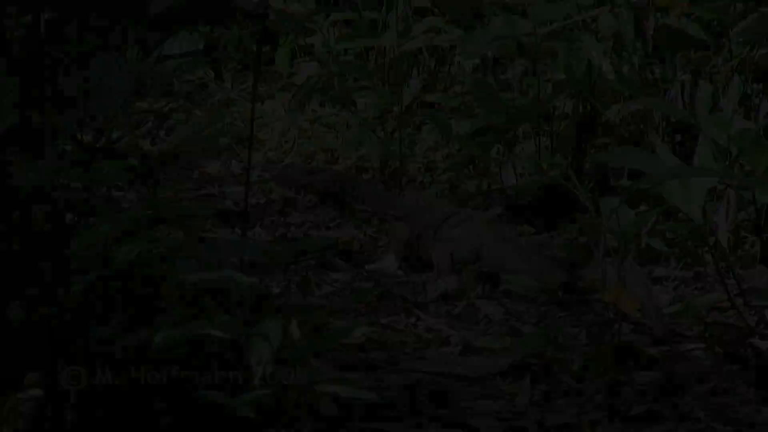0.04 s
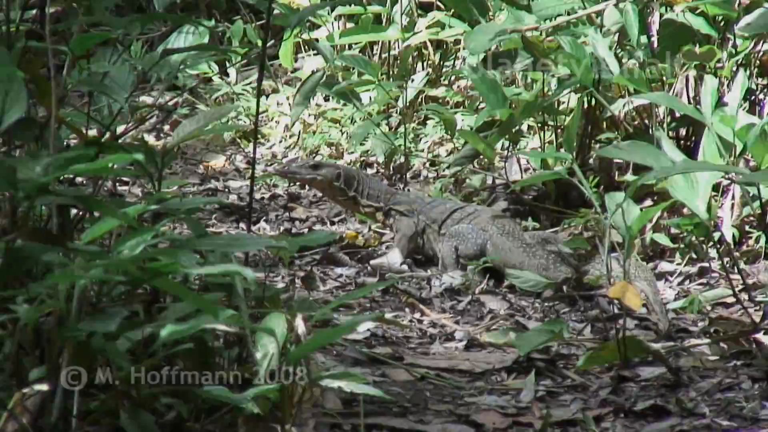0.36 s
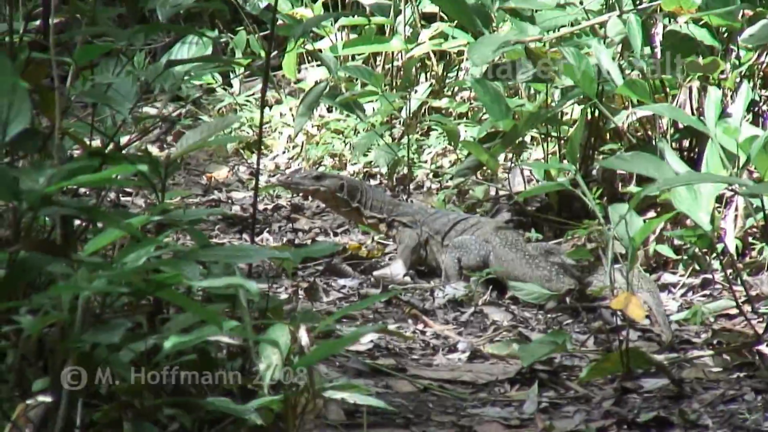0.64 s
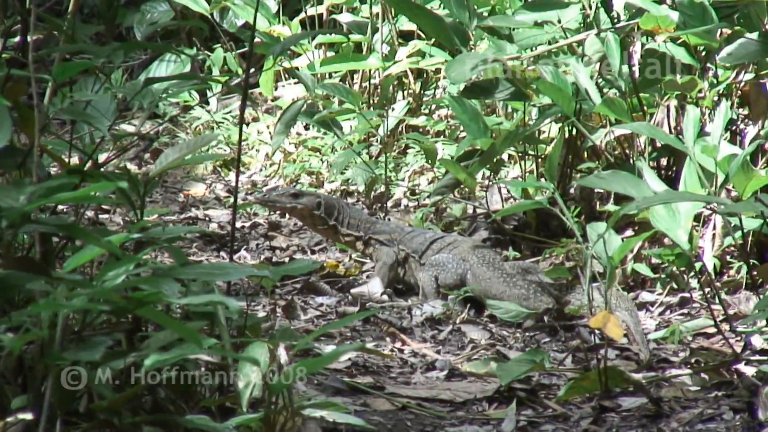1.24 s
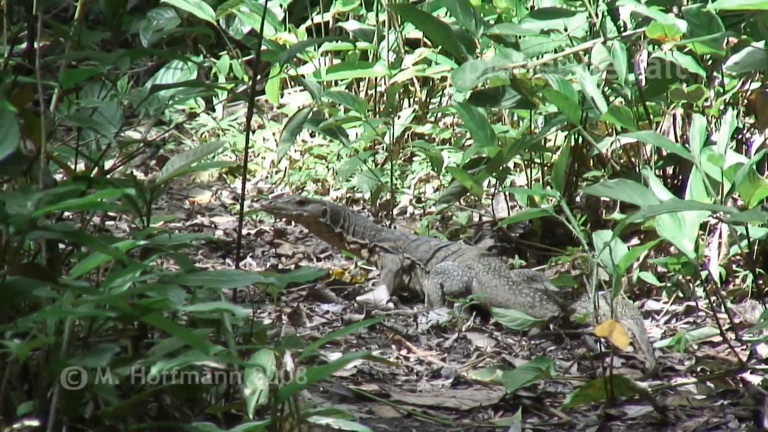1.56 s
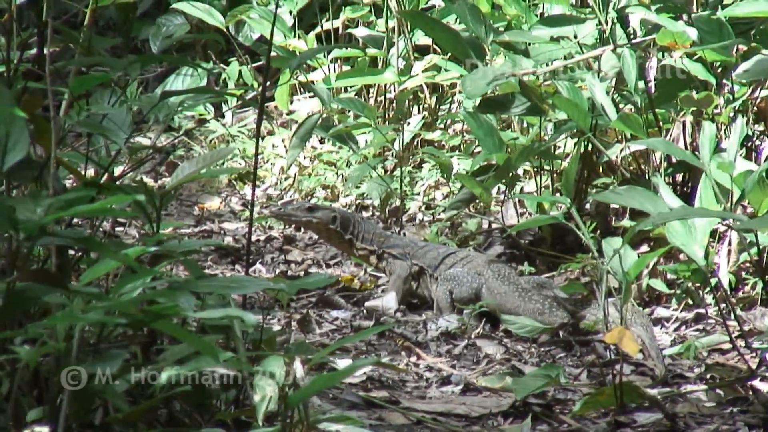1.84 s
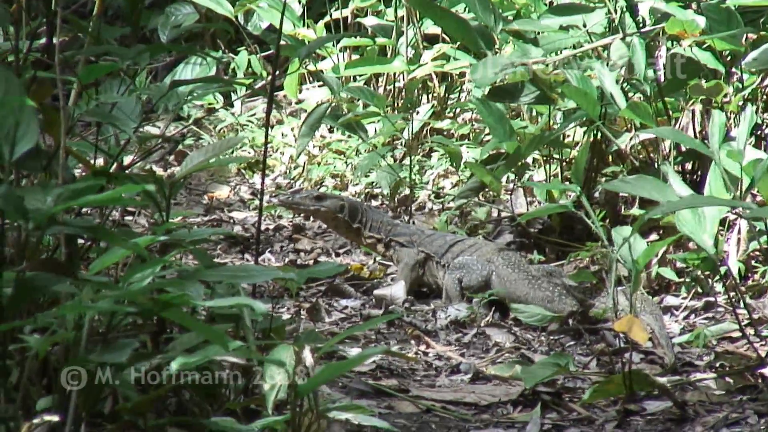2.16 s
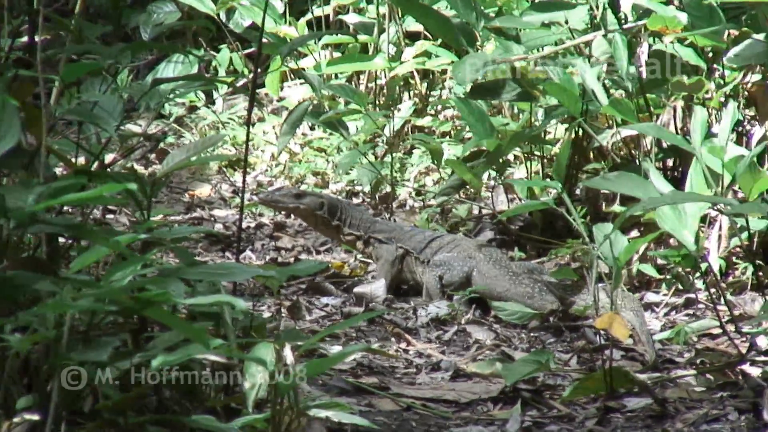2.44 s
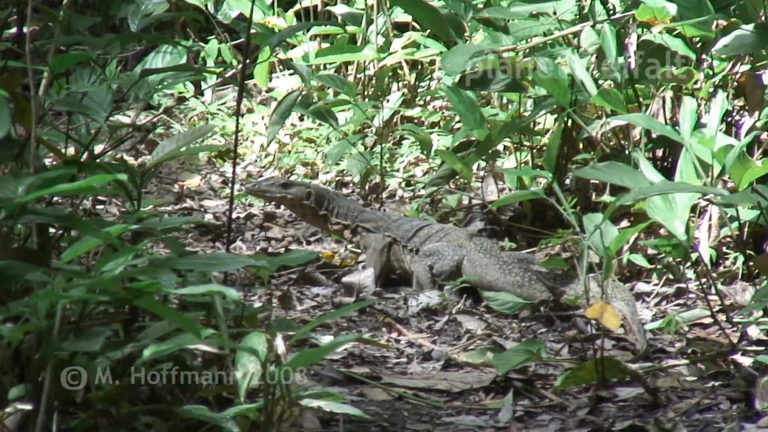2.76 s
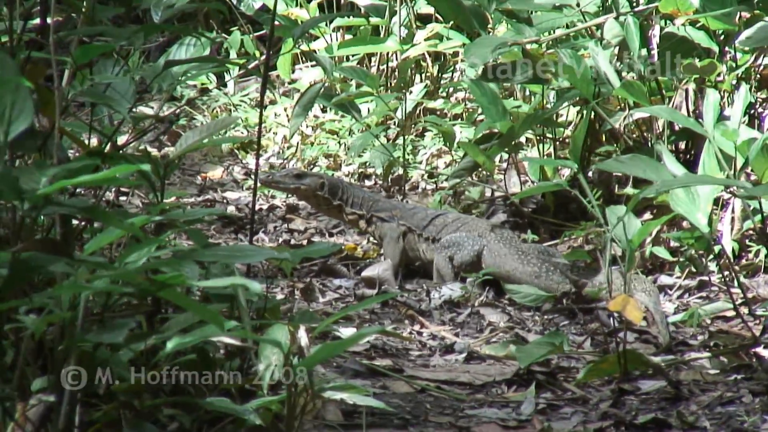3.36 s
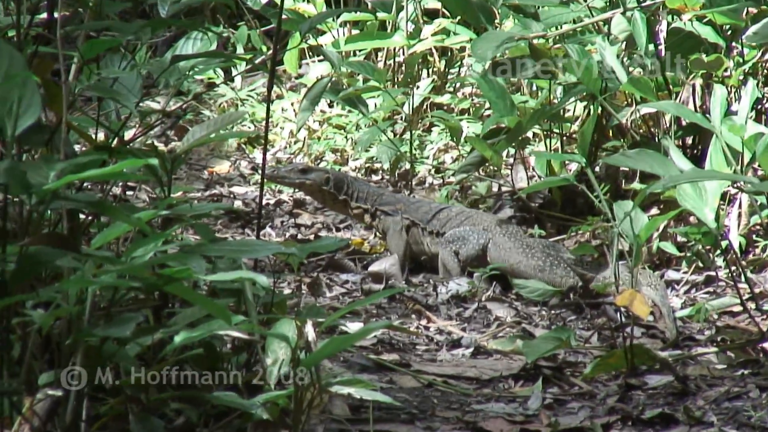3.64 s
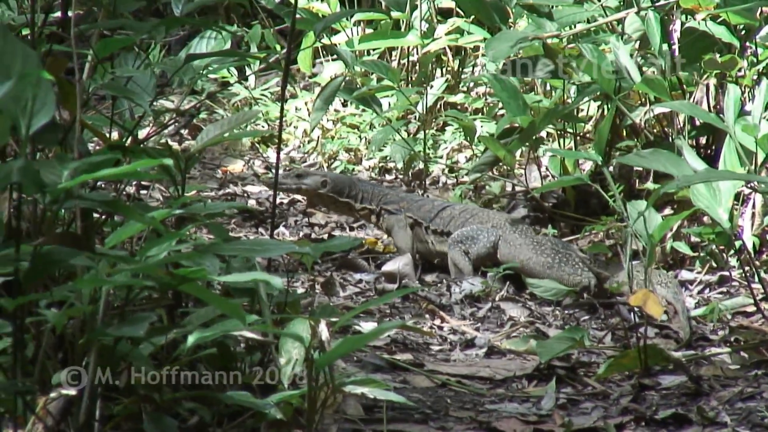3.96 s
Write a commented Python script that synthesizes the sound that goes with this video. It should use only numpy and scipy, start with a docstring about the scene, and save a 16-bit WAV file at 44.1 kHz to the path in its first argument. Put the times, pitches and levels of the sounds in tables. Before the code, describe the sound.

A chorus of cicadas and crickets fades in over the first half second and drones on all around until the end, at about 4 seconds. The cicadas' rattle eases slightly under the crickets' high sizzle. A nearer cricket, a little to the right, scrapes a short, very high buzz about every half second. Underneath lie a faint distant rumble, an even hiss and a barely audible motor hum.

```python
"""Tropical forest insects

Choruses of cicadas and bush crickets click all around, blurred into a drone by the foliage. One nearer
bush cricket scrapes a short buzz twice a second, strongest near 14.5 kHz. Underneath sits a bed of far
rumble, even hiss and faint motor hum. The whole mix fades in."""
import sys
import numpy as np
from scipy import signal
from scipy.fft import rfft, irfft, next_fast_len
from scipy.io import wavfile
from scipy.ndimage import map_coordinates

SR = 44100
rng = np.random.default_rng(int(sys.argv[2]) if len(sys.argv) > 2 else 0)


def store_pcm(level_fs):
    """Save levels as 16-bit WAV."""
    pcm = np.round(np.clip(level_fs, -1, 1) * 32767).astype(np.int16)
    wavfile.write(sys.argv[1], SR, np.atleast_2d(pcm).T)


N = 176400
TIME = np.arange(N) / SR


# Level ride of all the cicadas: t/s, level/dB
CICADA_RIDE = [(.3, -42.5), (.85, -43.5), (1.3, -44), (1.9, -45), (2.4, -46), (2.9, -46.5), (3.5, -47.5),
               (4, -46)]
# Cicada resonances: f/Hz, half width/Hz, flank steepness, level over the ride/dB, pan/dB
CICADA_BANDS = [(3654, 155, 2.76, -5.5, -2), (3967, 308, 2.07, 2, 1.3), (7850, 750, 1.83, -0.2, 0)]
def cicadas():
    """Massed clicks ring as a rattle near 4 kHz and its octave, easing and swelling together."""
    ride_db = np.interp(TIME, *np.transpose(CICADA_RIDE))
    return sum(chorus(hz, width_hz, steepness) * amp(ride_db + db) * pan(pan_db)
               for hz, width_hz, steepness, db, pan_db in CICADA_BANDS)


# Cricket choruses: f/Hz, half width/Hz, flank steepness, mid-scene level/dB, drift/(dB/s), pan/dB
CRICKET_BANDS = [(10514, 1480, 3.75, -37, 0.04, 1.6), (14770, 790, 2.7, -48.5, -1, 2.5),
                 (15360, 730, 2.6, -42.5, -1, 2)]
def far_crickets():
    """Distant bush crickets merge into a high sizzle whose top end slowly eases."""
    return sum(chorus(hz, width_hz, steepness) * amp(db + drift * (TIME - TIME.mean())) * pan(pan_db)
               for hz, width_hz, steepness, db, drift, pan_db in CRICKET_BANDS)


def chorus(pitch_hz, width_hz, steepness, singers=32, clicks_per_s=270, wet_db=-16):
    """Singers on each side click at their own rates, ring one resonance and blur among the leaves."""
    sides = [sum(clicks(clicks_per_s * np.exp(.2 * rng.standard_normal()), jitter=.35, scatter_db=2)
                 for _ in range(singers)) for side in range(2)]
    tone = lambda hz: resonance(hz, pitch_hz, width_hz, steepness) * (hz > pitch_hz / 4)
    direct = filtered(np.array(sides), tone)
    song = unit(unit(direct) + amp(wet_db) * unit(foliage(direct.sum(axis=0))))
    waver_db = .37 * np.array([wobble(11), wobble(11)])  # each side on its own
    surge_db = .54 * wobble(50)  # both sides together
    return song * amp(waver_db + surge_db)


# Buzz peaks: t/s, level before the dry/wet mix/dB
BUZZ_CUES = [(.155, -35), (.662, -35.3), (1.186, -36), (1.688, -36.8), (2.174, -37.5), (2.664, -35),
             (3.156, -35.5), (3.65, -36)]
# Wing resonances: f/Hz, half width/Hz, relative level/dB
WING_MODES = [(14620, 500, -1), (7330, 450, -9.5), (3720, 400, -11)]
def near_cricket(rise_s=.033, fall_s=.032, strokes_per_s=290, lag_s=28e-6, dry_db=-3, wet_db=-2):
    """Each buzz is a run of file strokes that swells and dies away, ringing the bush cricket's wing."""
    swell = sum(amp(db) * np.exp(-np.maximum((peak_s - TIME) / rise_s, (TIME - peak_s) / fall_s))
                for peak_s, db in BUZZ_CUES)
    wing = lambda hz: sum(amp(db) * resonance(hz, centre_hz, width_hz, steepness=2.6)
                          for centre_hz, width_hz, db in WING_MODES)
    strokes = clicks(strokes_per_s, jitter=.03, scatter_db=1.5)
    buzz = swell * unit(filtered(strokes, wing))
    # Placed to the right: the left ear hears it later and softer.
    direct = filtered(buzz, lambda hz: np.exp(np.pi * 1j * hz * lag_s * np.array([[-1], [1]])))
    return amp(dry_db) * direct * pan(-5) + amp(wet_db) * foliage(buzz)


def foliage(x, t60_s=.063):
    """A tight reverb: leaves scatter the sound to each ear along many short paths."""
    t = np.arange(SR // 8) / SR
    tail = rng.standard_normal((2, len(t))) * amp(-60 * t / t60_s)
    return signal.fftconvolve(x[None], tail / np.linalg.norm(tail[0]), axes=1)[:, :N]


# Rumble colour: f/Hz, relative level/dB
RUMBLE_EQ = [(20, -6.5), (45, -3), (100, -1.5), (175, 0.4), (250, -1), (370, 1), (480, -5), (680, -3.5),
             (1000, -11.5), (2000, -22.5), (6000, -62)]
# Rumble stereo image: f/Hz, left-right correlation
RUMBLE_IMAGE = [(35, .2), (80, 0.79), (170, 0.63), (330, 0.22), (700, 0.55)]
def far_rumble(level_db=-46.5):
    """A distant low end that gently heaves."""
    heave_db = .2 * wobble(4.96)
    return amp(level_db + heave_db) * noise_bed(RUMBLE_EQ, RUMBLE_IMAGE) * pan(-2.5)


# Hiss colour: f/Hz, relative level/dB
HISS_EQ = [(20, -2), (500, -6), (1000, 0), (3000, 1), (6000, -0.5), (9000, -2.5), (13000, -29),
           (16000, -23.5)]
# Hiss stereo image: f/Hz, left-right correlation
HISS_IMAGE = [(700, 0.081), (1300, .8), (1800, .85), (2600, 0.53), (3400, 0.33), (4500, 0.1), (8000, -0.17),
              (14000, -.2)]
def hiss(level_db=-43.5):
    """An even wash, narrow in the mids and wide on top."""
    return amp(level_db) * noise_bed(HISS_EQ, HISS_IMAGE) * pan(-1)


# Motor tones: f/Hz, level/dB, pan/dB
MOTOR_TONES = [(354.5, -65, -15.5), (574.7, -65, -12), (601, -68, -4)]
def motor_hum(flutter_db=2.6, wander_hz=1.64):
    """A motor's faint tones, each a little unsteady in level and pitch."""
    hum = 0
    for hz, db, pan_db in MOTOR_TONES:
        gain = amp(db + flutter_db * wobble(6.05))
        phase = 2 * np.pi * np.cumsum(hz + wander_hz * wobble(10)) / SR
        hum += gain * pan(pan_db) * unit(np.sin(phase))
    return hum


def noise_bed(eq, image):
    """Stereo noise of rms 1; the mid/side balance sets the correlation at each frequency."""
    def mid_side_gains(hz):
        angle = np.arccos(np.clip(along(image, hz), -1, 1)) / 2
        return amp(along(eq, hz)) * [np.cos(angle), np.sin(angle)]
    mid, side = filtered(rng.standard_normal((2, N)), mid_side_gains)
    return unit(np.array([mid + side, mid - side]))


def clicks(per_s, jitter, scatter_db):
    """An uneven click train; jitter is a share of the click spacing."""
    timing, strength = rng.standard_normal((2000, 2)).T
    at = np.round((np.arange(len(timing)) + rng.random() + jitter * timing) * SR / per_s).astype(int)
    heard = (at >= 0) & (at < N)
    return np.bincount(at[heard], amp(scatter_db * strength[heard]), N)


def resonance(hz, centre_hz, width_hz, steepness):
    """A ringing peak with adjustable flanks."""
    return (1 + 1j * (hz - centre_hz) / width_hz) ** -steepness


def filtered(x, response):
    """Shape x with a frequency response."""
    size = next_fast_len(N + SR // 2)
    return irfft(rfft(x, size) * response(np.fft.rfftfreq(size, 1 / SR)), size)[..., :N]


def wobble(knots_per_s):
    """A smooth random modulator."""
    return map_coordinates(rng.standard_normal(int(N * knots_per_s / SR) + 4), [TIME * knots_per_s])


def along(points, hz):
    """Read a curve on a log frequency axis."""
    knots_hz, values = np.transpose(points)
    return np.interp(np.log(hz + 1), np.log(knots_hz + 1), values)


def pan(db):
    """Stereo gains for a pan given as left minus right in dB."""
    return amp([[db / 2], [-db / 2]])


def amp(db):
    """Decibels to gain."""
    return 10 ** (np.asarray(db) / 20)


def unit(x):
    """Scale to rms 1."""
    return x / np.sqrt(np.mean(x ** 2) + 1e-20)


def scene():
    """The mix: insects over the background bed."""
    return cicadas() + far_crickets() + near_cricket() + far_rumble() + hiss() + motor_hum()


def record(dry):
    """The master: a linear fade-in, then a brick-wall high cut."""
    start_s, full_s, cut_hz = .046, .45, 15750
    fade = np.clip((TIME - start_s) / (full_s - start_s), 0, 1)
    return filtered(dry * fade, lambda hz: hz < cut_hz)


dry = scene()
out = record(dry)
store_pcm(out)
```